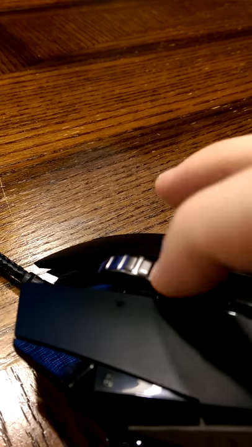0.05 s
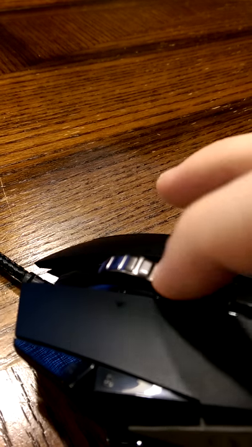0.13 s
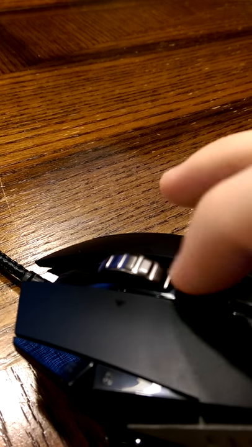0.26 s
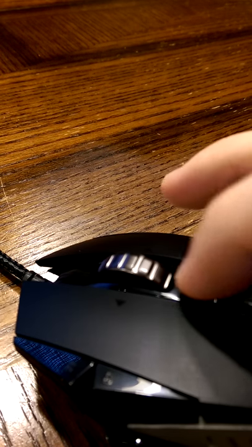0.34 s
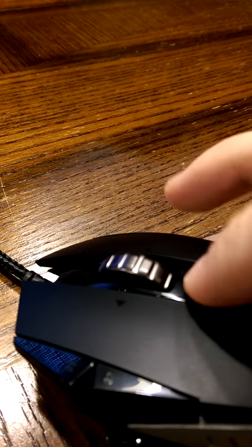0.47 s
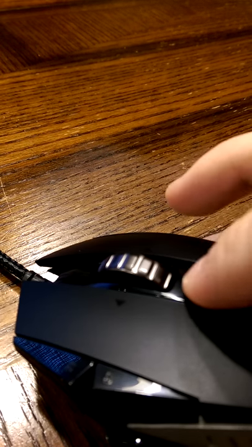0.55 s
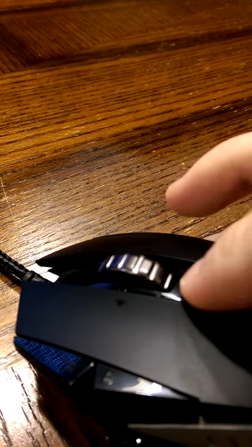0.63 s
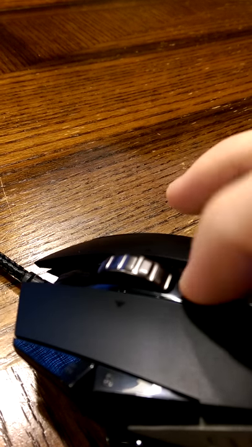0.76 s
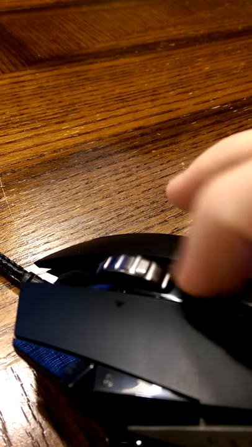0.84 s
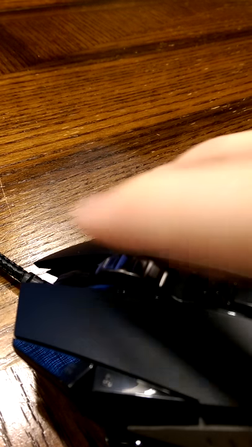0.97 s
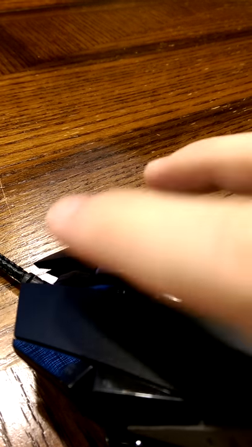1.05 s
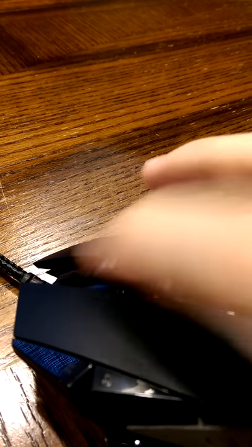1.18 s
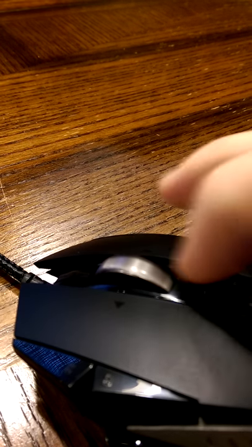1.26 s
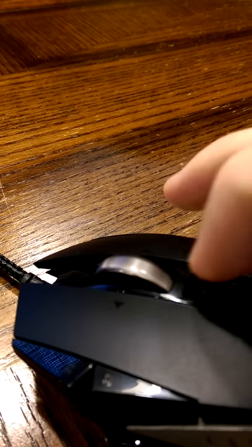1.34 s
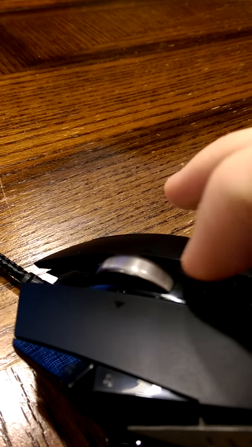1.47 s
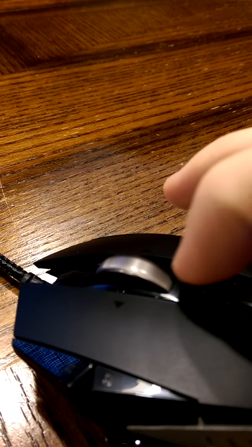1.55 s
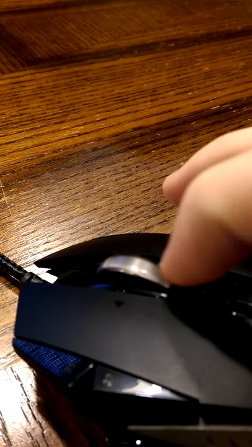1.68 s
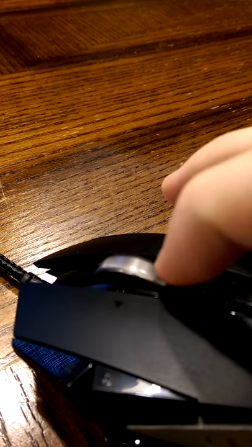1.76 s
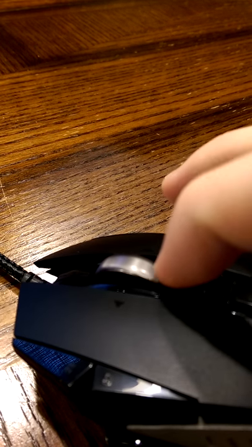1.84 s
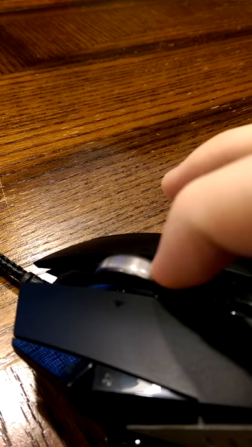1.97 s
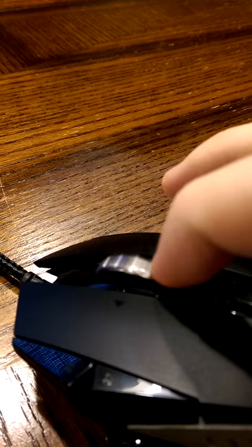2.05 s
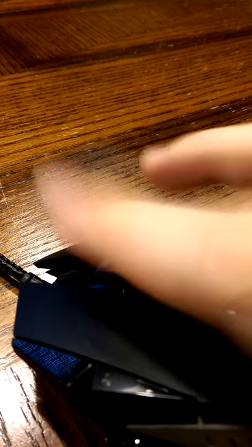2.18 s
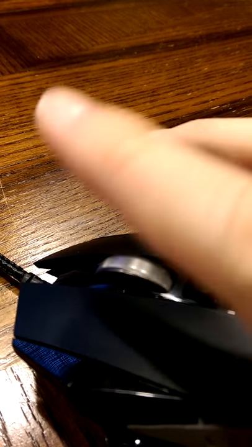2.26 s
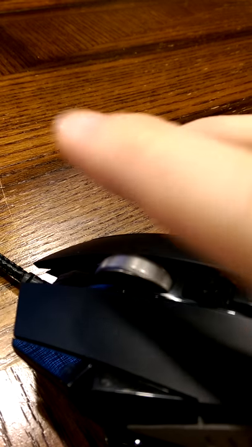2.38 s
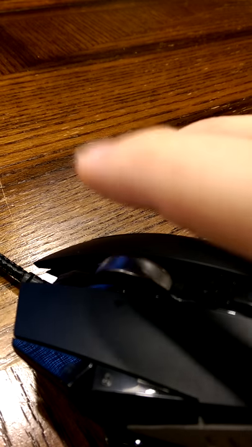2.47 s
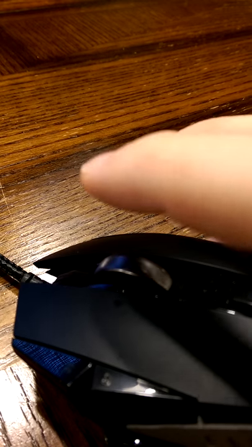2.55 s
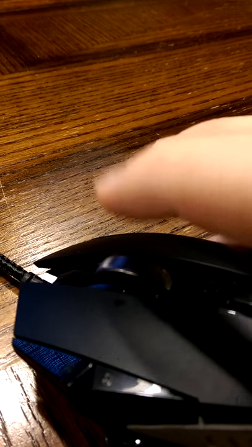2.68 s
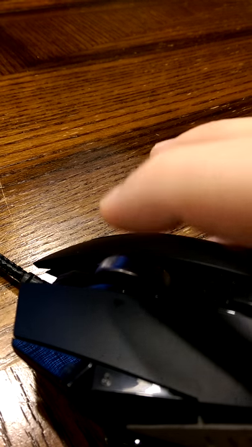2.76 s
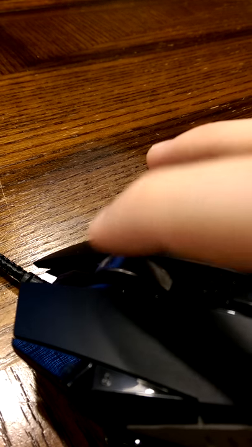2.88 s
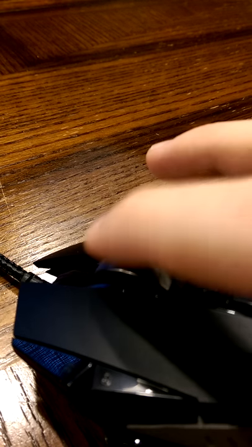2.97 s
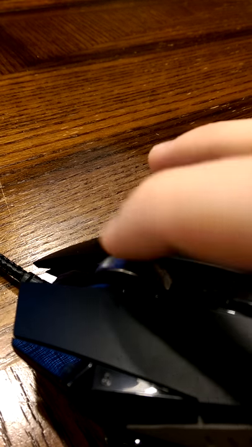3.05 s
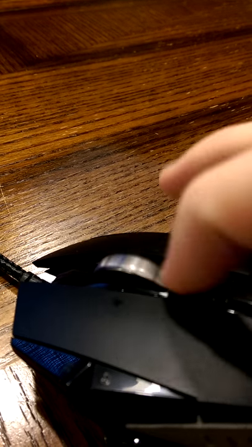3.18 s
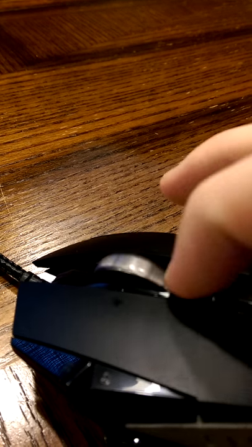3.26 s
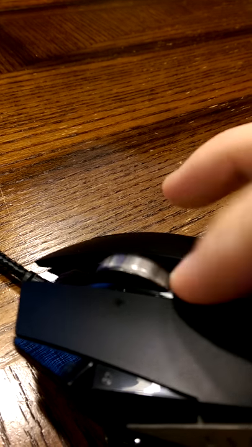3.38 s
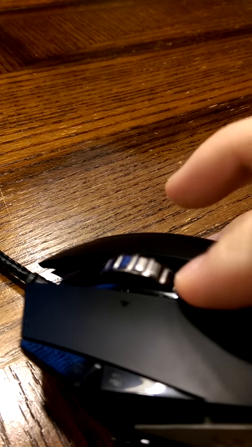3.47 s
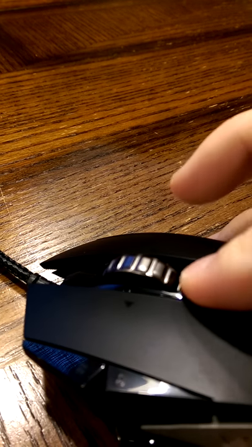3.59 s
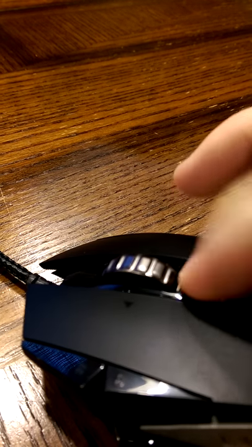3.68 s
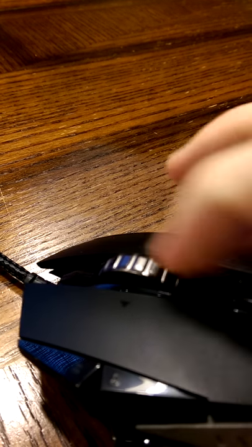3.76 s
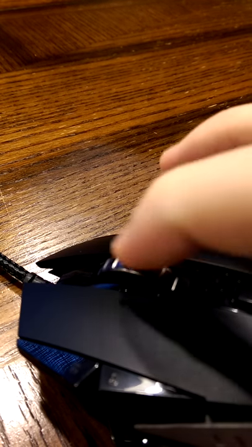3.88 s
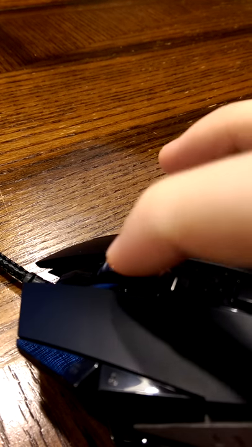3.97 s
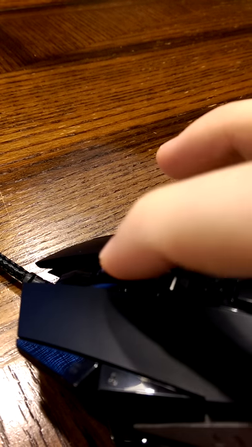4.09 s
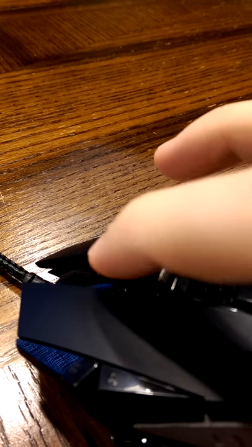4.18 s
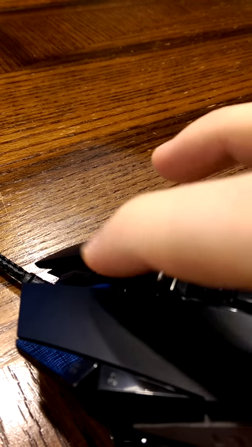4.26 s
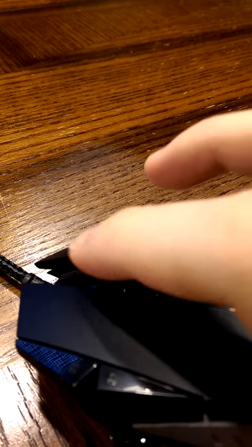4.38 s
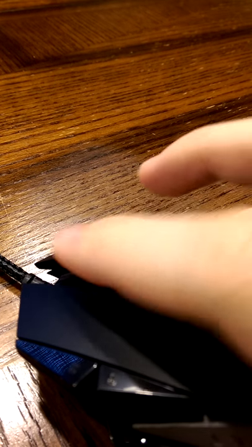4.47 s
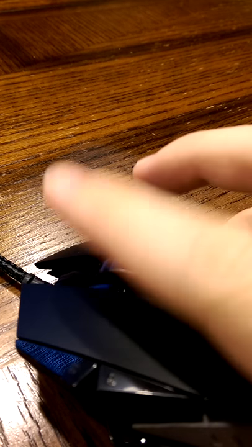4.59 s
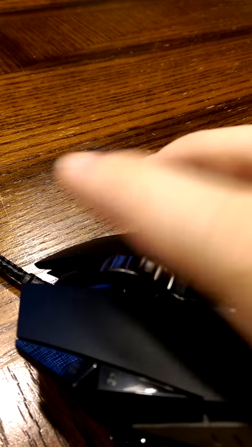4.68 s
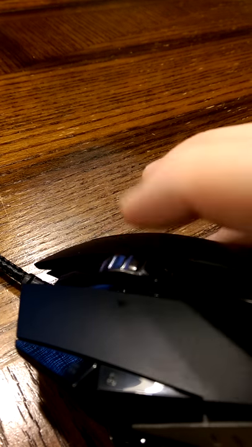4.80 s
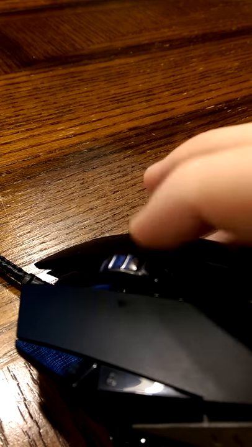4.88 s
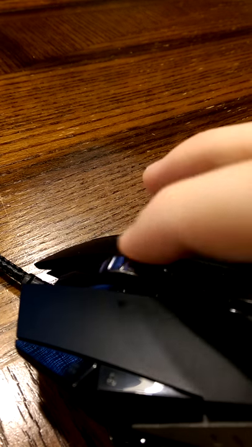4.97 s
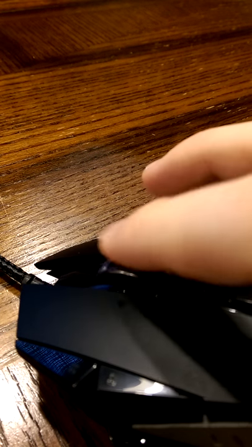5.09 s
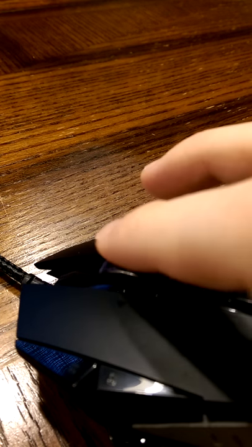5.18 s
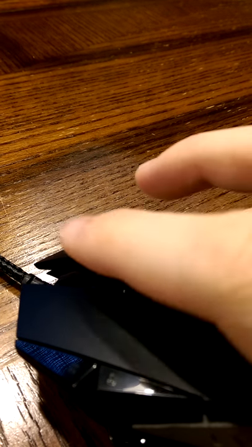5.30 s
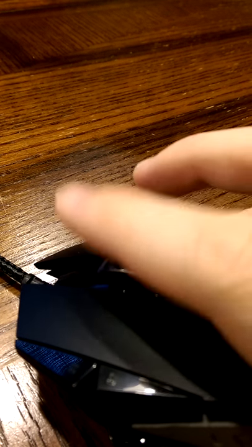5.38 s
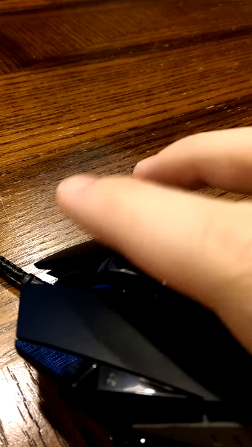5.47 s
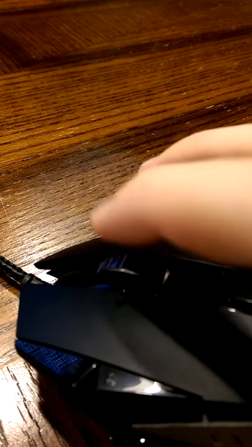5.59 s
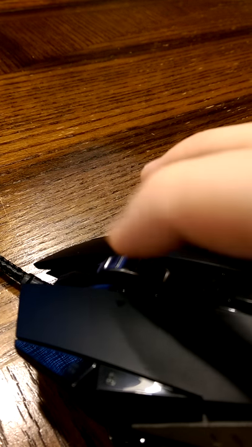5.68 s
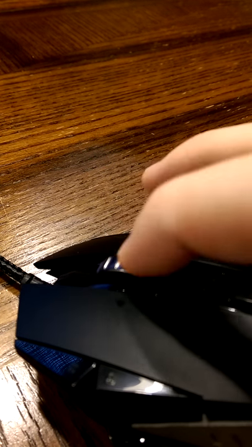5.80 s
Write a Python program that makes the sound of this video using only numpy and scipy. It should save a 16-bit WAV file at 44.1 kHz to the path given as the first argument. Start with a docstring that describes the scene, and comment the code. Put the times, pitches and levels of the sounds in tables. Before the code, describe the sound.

A quiet small room with low murmur and soft microphone hiss. A mouse with a metal scroll wheel sits on a wooden desk, miked very close; one channel is bright, the other shaded and duller. A tiny click comes at 0.46 s, then a loud, bright latch snap at 0.68 and a weaker one at 0.88, with light clicks and a pat beside it and a thin spring ring fading after. From about 1.2 to 3.3 s the wheel spins freely: a faint wavering whir, low rumble and fine rattle with irregular little knocks, coasting away afterwards. Fingertip pats at 3.3 lead to a dense flurry of clicks around 3.5, then hard snaps at 3.57 and 3.77, spring singing on. Slow ratchet clicks with dull desk thumps run 4.25-4.6, single clicks fall at 5.0 and 5.2, and a fast crisp burst at 5.3-5.44. Hiss remains.

```python
"""In a quiet, hissing room, a finger works the metal scroll wheel of a mouse on a wooden desk, by a phone.
First a detent clicks and a latch snaps the ratchet off; its spring sings on as decaying bands of noise.
Then the wheel spins freely: wavering noise makes a faint whir, and struck resonances make the axle's knocks.
A fingertip pats the shell, more detents click and the latch snaps back: noisy blows that ring small parts.
Last, the wheel rolls over its detents in short bursts that thump the desk. One port is close, one shaded."""
import sys
import numpy as np
from scipy import signal
from scipy.fft import rfft, irfft
from scipy.io import wavfile

SR = 44100
rng = np.random.default_rng(int(sys.argv[2]) if len(sys.argv) > 2 else 0)


def master(y):
    """Save y as 16-bit WAV."""
    cut = np.clip(np.atleast_2d(y).T, -1, 1)
    pcm = np.round(cut * 32767)  # scale
    wavfile.write(sys.argv[1], SR, pcm.astype(np.int16))


N = 257544
TIME = np.arange(N) / SR

# murmur of the quiet room and hiss of the microphone, before the port colours: (f/Hz, level per Hz/dB)
QUIET_COLOUR = [(15, -39.5), (25, -13.5), (86, -2.5), (160, -10.5), (253, -0.5), (274, -8.5), (482, -9),
                (537, -13), (1410, -29), (2170, -27), (2850, -29.5), (3170, -29), (5730, -29.5),
                (7500, -30.5), (15500, -34)]
QUIET_DB = -65.5  # base level, before the colours below
# colours of the murmur at both ports, of each port's own hiss, and of each port: (f/Hz, gain/dB)
SHARED_MURMUR = [(40, -7.0), (150, -3), (400, -7.0), (1000, -5.5), (3000, -13.5)]
OWN_HISS = [(40, 1.5), (150, -10.5), (400, -8.5), (1000, 0.0), (3000, 3.0)]
NEAR_PORT = [(100, 2), (400, 10.0), (5000, 0.82), (15000, 0.49)]
FAR_PORT = [(100, -2.5), (400, 2.4), (5000, -0.5), (15000, -0.2)]

# colour of the room's answer: (f/Hz, gain/dB)
ROOM_COLOUR = [(100, -15), (400, 1.5), (900, 2), (1400, 6), (1900, 4), (2400, 4.5), (3700, -0.5),
               (5000, -1), (7000, -3.5), (8600, -5), (11000, -1.5), (15000, -17)]
# time the room takes to fade by 60 dB: (f/Hz, t60/s)
ROOM_FADE = [(200, 0.92), (1200, 0.34), (3500, 0.38), (7000, 0.52), (11000, 0.48), (15000, 0.69)]
# the shaded port against the near one, for direct sound: (f/Hz, gain/dB)
DIRECT_SHADE = [(100, -9.5), (300, -2.5), (700, -5), (1200, -4), (1700, -5), (2400, -22), (4000, -24),
                (6000, -24), (8000, -33.5), (11000, -38.5), (15000, -26)]
# colour of the shaded port's room sound: (f/Hz, gain/dB)
FAR_ROOM_SHADE = [(200, 7), (1300, 0), (3000, -6), (5000, -8.5), (7000, -15.5), (11000, -17.5),
                  (15000, -20)]
# colour of the ratchet's echo off a nearby surface: (f/Hz, gain/dB)
BOUNCE_COLOUR = [(300, -10), (1000, -3.0), (2500, 4.0), (8000, -13.5)]
TOP_HZ = 15800  # the treble is cut above this

# resonances of the desk under the mouse: (f/Hz, width/Hz, peak level/dB)
DESK_MODES = [(167, 11, -0.5), (200, 22, -7.5), (275, 7.7, 2), (285.5, 10, 2), (334.8, 4.9, 7),
              (381, 32, -6), (545.5, 12, -10), (760, 110, -14.5)]
# resonances of the wheel in its cradle: (f/Hz, width/Hz, peak level/dB)
WHEEL_MODES = [(963, 51, -2.5), (1142, 110, 5), (1297.6, 400, -2.5), (1341, 130, -15)]
# resonances of the pawl, the small catch on the teeth: (f/Hz, width/Hz, peak level/dB)
PAWL_MODES = [(1816, 280, -5.5), (2247, 220, -3), (2780, 120, -2), (3450, 220, -7.5), (4940, 340, -6.5),
              (5768, 170, -3), (6900, 300, -7.5), (7260, 100, -7), (8030, 100, -6.5), (8100, 140, -19.5),
              (9700, 700, -20), (12500, 1300, -38.5)]
# resonances of the latch and the shell: (f/Hz, width/Hz, peak level/dB)
LATCH_MODES = [(1510, 89, -3), (1740, 96, -3.5), (2040, 200, -2), (2230, 190, 4.5), (3070, 180, 2),
               (3750, 67, -3), (4900, 370, 5), (5750, 1200, -5.5), (6607, 220, 3.5), (7800, 250, 0),
               (8450, 190, -16), (9790, 790, -4.5), (10930, 210, 3), (11070, 170, -4), (12170, 1200, -4.5)]
# colour of the desk's dull thud: (f/Hz, gain/dB)
THUD_COLOUR = [(30, -15.0), (80, -2.5), (300, -1.5), (600, -5.0), (1000, -3.5), (2500, -37.0)]
# colour of the wheel's ring at a click: (f/Hz, gain/dB)
WHEEL_COLOUR = [(1500, -3.5), (4000, -4)]

# the free spin, before its trims: (t/s, rumble level in the desk/dB, rattle level of the wheel/dB)
SPIN_LEVELS = [(1.25, -58.5, -67.5), (1.35, -59.5, -70), (1.98, -59, -72.5), (2.05, -51.5, -66.5),
               (2.16, -63, -72.5), (2.9, -62.5, -70), (3.02, -71.5, -79), (3.03, -56, -64),
               (3.13, -70.5, -79.5), (3.25, -64.5, -67)]
SPIN_DOWN_S = 0.47  # the wheel coasts to rest
# colour of the bearing's rumble: (f/Hz, level per Hz/dB)
RUMBLE_COLOUR = [(60, -24.5), (150, -10.5), (220, -12.5), (280, 0), (345, -9), (400, -6), (520, -17.5),
                 (750, -14.5), (1500, -37)]
# colour of the bearing's hiss, heard as rattle: (f/Hz, level per Hz/dB)
RATTLE_COLOUR = [(700, -24.5), (1000, -7), (1200, -6), (1450, -14), (1800, -12.5), (2350, -11.5),
                 (3300, -19), (4300, -20), (5050, -20.5), (6200, -28.5), (10000, -30.5), (15000, -43.5)]
# the hardest knocks of the axle in its bearing, before trims: (t/s, level/dB)
HARD_AXLE_KNOCKS = [(1.2104, -45.5), (1.4575, -46), (1.671, -48.5), (1.7849, -46), (1.9828, -49),
                    (2.0226, -48.5), (2.038, -46.5), (2.3279, -50), (2.4202, -49), (2.5128, -49),
                    (2.5793, -48), (2.6281, -47.5), (2.8169, -47.5), (3.035, -48.5), (3.0955, -52),
                    (3.1946, -50.5)]
# lighter knocks come at uneven gaps between these times
KNOCKS_FROM_S, KNOCKS_TO_S, KNOCKS_PER_S, KNOCK_JITTER_S = 1.27, 3.28, 26, 0.013
LIGHT_KNOCK_DB, KNOCK_SPREAD_DB = -58.5, 2.5  # before trims
# a soft contact leaves little above the wheel's own ring: (f/Hz, gain/dB)
KNOCK_COLOUR = [(1350, 3.0), (1750, -14)]

# the fingertip lands on the shell: (t/s, pat level/dB)
FINGER_TOUCHES = [(0.858, -48.5), (3.3114, -41.5), (3.342, -47)]
# colour of the soft pat: (f/Hz, gain/dB)
PAT_COLOUR = [(40, 5), (100, 2), (600, -1), (900, -12), (1600, 1.5), (3400, -15.5), (4300, -27)]

# the latch spring sings on after a snap: (t/s, f/Hz, width/Hz, t60/s, starting level/dB)
SPRING_SONGS = [(0.676, 4960, 260, 0.39, -45.5), (0.883, 5330, 500, 0.27, -54),
                (3.567, 7390, 400, 0.4, -51), (3.771, 6230, 304, 0.48, -46.5),
                (3.772, 7440, 195.6, 0.6, -52.5)]
# the latch button, pressed and let go twice:
# (t/s, level/dB, brightness/dB, wheel ring level/dB, desk thump level/dB)
LATCH_SNAPS = [(0.6751, -13.5, 3, -31, -44.5), (0.8822, -23, 4, -44.5, -49),
               (3.5671, -13.5, 2.5, -39, -38.5), (3.7708, -13.5, 10.5, -27, -46.5)]

# the wheel's clicks at its detents; a few dull rows, just after a loud click, are the wheel rocking back: (t/s,
# level/dB, brightness/dB, desk thump level/dB)
DETENT_CLICKS = [(0.4626, -56.5, 14, -80), (0.8447, -46.5, 5, -47.5), (0.8786, -43, 12, -56),
                 (1.2103, -51, -12, -56.5), (3.265, -52, 21.5, -69), (3.4933, -38, 1, -50.5),
                 (3.5039, -40.5, 7, -48), (3.5345, -38.5, -6, -56), (3.542, -39.5, -7, -45.5),
                 (3.5545, -43.5, 4, -47.5), (3.5634, -35.5, -7, -51.5), (4.2464, -35.5, 0, -45),
                 (4.269, -48.5, -19, -43), (4.4362, -37.5, 5.5, -38.5), (4.506, -39.5, 3, -40),
                 (4.5497, -38, 12, -46), (4.5720, -40.5, -9, -47.5), (4.5942, -48.5, 10.5, -46),
                 (5.005, -51.5, 14, -61.5), (5.204, -39, 7, -46), (5.295, -35.5, 6.5, -50.5),
                 (5.3188, -32, -3, -42), (5.3442, -35.5, -12, -43.5), (5.3535, -43.5, 5, -42.5),
                 (5.4276, -41, 2, -41), (5.4384, -43, -13, -46)]
# the pawl's own blow rings the wheel too, against the click's level
PAWL_RING_DB = -8.5
# the wheel seats just after the pawl; tick and ring levels are against the click
SEAT_LAG_S, SEAT_DB, SEAT_BRIGHT_DB, SEAT_RING_DB = 0.002, -12.5, -9.5, -4
# rolled slowly between these times, the wheel takes up its slack with a dull knock before each tooth
SLOW_FROM_S, SLOW_TO_S, SLACK_LEAD_S = 4.2, 4.56, 0.0068
# knock and ring against the click, thump against the click's thump
SLACK_DB, SLACK_BRIGHT_DB, SLACK_RING_DB, SLACK_THUMP_DB = -9.5, -13.5, -13, -11
# colour of the pawl's rub: (f/Hz, gain/dB)
RUB_COLOUR = [(400, -23.0), (1200, -9.0), (4000, -10), (7600, 1.0), (10000, -10.0), (15000, -22.5)]


def undb(db):
    """Turn decibels into a gain."""
    return 10 ** (np.asarray(db) / 20)


def unit(x):
    """Scale to an rms (average strength) of 1."""
    return x / np.sqrt(np.mean(x ** 2))


def unit_energy(x):
    """Scale so that the squares of all samples add up to 1."""
    return x / np.sqrt(np.sum(x ** 2))


def on_log_axis(points, hz):
    """Read (f/Hz, value) points along a log-frequency axis."""
    f, value = np.transpose(points)
    return np.interp(np.log(np.maximum(hz, 1)), np.log(f), value)


def colour(x, points, size=4096):
    """Filter by (f/Hz, gain/dB) points; folding the cepstrum forward in time keeps the filter causal."""
    gain = undb(on_log_axis(points, np.fft.rfftfreq(size, 1 / SR)))
    cepstrum = irfft(np.log(gain))
    cepstrum[1:size // 2] *= 2
    cepstrum[size // 2 + 1:] = 0
    response = irfft(np.exp(rfft(cepstrum)))
    return signal.fftconvolve(x, response)[:len(x)]


def noise(points):
    """Make coloured noise of rms 1."""
    return unit(colour(rng.standard_normal(N), points))


def walk(rate):
    """Wander at random, with this many new values per second and a spread near 1."""
    knots = rng.standard_normal(N // 100)
    return np.interp(TIME * rate, np.arange(len(knots)), knots)


def delay(x, seconds):
    """Play the same sound later."""
    return np.concatenate([np.zeros(int(seconds * SR)), x])[:len(x)]


def add(track, s, sound):
    """Mix a sound into a track at time s."""
    start = int(s * SR)
    track[start:start + len(sound)] += sound[:N - start]


def sized(x, db, span_s=0.005):
    """Give a blow the energy of span_s seconds at this level."""
    return unit_energy(x) * undb(db) * np.sqrt(span_s * SR)


def ring(modes, size, detune=0., spread_db=0.):
    """Ring a body as one fading wave per resonance, each varied a little with the place of the blow."""
    t = np.arange(size) / SR
    out = np.zeros(size)
    chances = rng.standard_normal((len(modes), 2))
    for k, ((hz, width, db), (pitch_chance, level_chance)) in enumerate(zip(modes, chances)):
        fade = np.exp(-np.pi * width * t)
        wave = fade * np.cos(2 * np.pi * hz * (1 + detune * pitch_chance) * t)
        sign = (-1) ** k
        # a wider resonance fades sooner, so it starts stronger to reach the same peak
        out += sign * undb(db + spread_db * level_chance) * width * wave
    return out


def contact(length_s, size=1024, count=5):
    """Make a blow that starts at once and chatters for a moment, random but even across the spectrum."""
    t = np.arange(1, size + 1) / SR / length_s
    shape = np.sqrt(t) * np.exp(-t)
    x = rng.standard_normal(size) * shape
    for _ in range(count):  # flatten the spectrum, then fade again
        spectrum = rfft(x)
        x = irfft(spectrum / (abs(spectrum) + 1e-12)) * np.sqrt(shape)
    return x


def radiate(x, edge_hz):
    """Cut the bass: a small part moves almost no air below its edge frequency."""
    return signal.sosfilt(signal.butter(N=4, Wn=edge_hz, btype="high", fs=SR, output="sos"), x)


def strike(modes, length_s, crack, detune=0.005, spread_db=3.0, edge_hz=900, size=2048):
    """Ring a body with a chattering blow; beside the ring comes a toneless crack."""
    ringing = unit(signal.fftconvolve(contact(length_s), ring(modes, size, detune, spread_db)))
    toneless = unit(np.pad(contact(length_s), (0, size - 1)))
    return radiate(ringing + crack * toneless, edge_hz)


def quiet_room():
    """Low room murmur reaches both ports alike; each port adds hiss of its own."""
    shared = colour(noise(QUIET_COLOUR), SHARED_MURMUR) * undb(walk(15))
    near_hiss, far_hiss = (colour(noise(QUIET_COLOUR), OWN_HISS) for _ in range(2))
    near = colour(shared + near_hiss, NEAR_PORT)
    far = colour(shared + far_hiss, FAR_PORT)
    return undb(QUIET_DB) * np.array([near, far])


def room(x, build_s, size=32768):
    """A small room answers with a diffuse tail that builds up, then fades at a rate set by frequency."""
    hz, t, cells = signal.stft(rng.standard_normal(size), SR, nperseg=256)
    fade = undb(-60 * t / on_log_axis(ROOM_FADE, hz)[:, None])
    tail = signal.istft(cells * fade, SR)[1]
    tail *= 1 - np.exp(-(np.arange(len(tail)) / SR / build_s) ** 2)
    return colour(signal.fftconvolve(x, unit_energy(tail))[:N], ROOM_COLOUR)


def reflection(x, lag_s, db, smear_s):
    """A nearby surface throws the sound back, a little scattered."""
    scattered = signal.fftconvolve(x, unit_energy(contact(smear_s)))[:N]
    return undb(db) * delay(scattered, lag_s)


def thump(rise_s=0.001, thud_db=-9):
    """The heavy desk takes a moment to get ringing, beside a dull thud."""
    desk = ring(DESK_MODES, size=16384, detune=0.0047, spread_db=4.5)
    desk = unit(desk * (1 - np.exp(-np.arange(len(desk)) / SR / rise_s)))
    thud = colour(contact(0.0038, size=len(desk)), THUD_COLOUR)
    return desk + undb(thud_db) * unit(thud)


def axle_knocks(count=90):
    """The loose axle gives a few hard knocks among many light ones: rows of (t/s, level/dB)."""
    late, force = rng.standard_normal((count, 2)).T
    times = KNOCKS_FROM_S + np.arange(count) / KNOCKS_PER_S + KNOCK_JITTER_S * late
    light = zip(times, LIGHT_KNOCK_DB + KNOCK_SPREAD_DB * force)
    return list(HARD_AXLE_KNOCKS) + [(s, db) for s, db in light if s < KNOCKS_TO_S]


def free_spin(rumble_db, rattle_db, rough_db, knock_db, knock_s, tick_db, thump_db):
    """The bearing rumbles through the desk and rattles the wheel; now and then the axle knocks."""
    s, desk_db, wheel_db = np.transpose(SPIN_LEVELS)
    turning = np.interp(TIME, [s[0] - .02, s[0], s[-1], s[-1] + SPIN_DOWN_S], [0, 1, 1, 0])
    rumble = noise(RUMBLE_COLOUR) * undb(np.interp(TIME, s, desk_db) + rumble_db + walk(59))
    rattle_level = np.interp(TIME, s, wheel_db) + rattle_db + rough_db * walk(130)
    rattle = noise(RATTLE_COLOUR) * undb(rattle_level)
    out = (rumble + rattle) * turning
    for s, db in axle_knocks():
        knock = colour(strike(WHEEL_MODES, knock_s, 0), KNOCK_COLOUR)
        tick = strike(PAWL_MODES, .002, 0.14)
        desk = ring(DESK_MODES[2:6], size=8192, detune=.05)
        add(out, s, sized(knock, db + knock_db))
        add(out, s, sized(tick, db + tick_db))
        add(out, s, sized(desk, db + thump_db))
    return out


def fingertip(contact_s, nail_db, thump_db):
    """Soft flesh gives a dull, toneless pat; the nail ticks and the desk thumps faintly."""
    out = np.zeros(N)
    for s, db in FINGER_TOUCHES:
        pat = colour(contact(contact_s, size=2048), PAT_COLOUR)
        nail = strike(PAWL_MODES, contact_s, .4)
        add(out, s, sized(pat, db))
        add(out, s, sized(nail, db + nail_db))
        add(out, s, sized(thump(), db + thump_db, .025))
    return out


def spring_song(size=22050):
    """The spring's coils share close partials, made as a narrow band of noise that outlasts the snap."""
    out, t = np.zeros(N), np.arange(size) / SR
    for s, hz, width, t60, db in SPRING_SONGS:
        band = [(hz - 2 * width, -45), (hz - width / 2, -3), (hz, 0),
                (hz + width / 2, -3), (hz + 2 * width, -45)]
        cluster = unit(colour(rng.standard_normal(size), band))
        add(out, s, cluster * undb(db - 60 * t / t60))
    return out


def clicks(table, modes, contact_s, wheel_s, crack, detune, top_db, thump_lag_s):
    """A spring drops into place: the small part cracks, the wheel rings, the desk thumps."""
    out = np.zeros(N)
    for s, db, bright_db, wheel_db, thump_db in table:
        half_db = bright_db / 2  # brightness lowers the bass side and lifts the treble side
        tilt = [(2500, -half_db), (9000, half_db), (11500, half_db + top_db / 4), (15500, half_db + top_db)]
        part = colour(strike(modes, contact_s, crack, detune), tilt)
        wheel = colour(strike(WHEEL_MODES, wheel_s, 0, edge_hz=360), WHEEL_COLOUR)
        add(out, s, sized(part, db))
        add(out, s, sized(wheel, wheel_db))
        add(out, s + thump_lag_s, sized(thump(), thump_db, 0.016))
    return out


def pawl_rub(rub_db, swell_s, size=2048):
    """Before each click the pawl slides up a tooth with a thin hiss; a louder, brighter click hisses more."""
    out = np.zeros(N)
    swell = np.exp(-np.arange(size)[::-1] / SR / swell_s)
    for s, db, bright_db, _ in DETENT_CLICKS:
        hiss = unit(colour(rng.standard_normal(size), RUB_COLOUR))
        add(out, s - size / SR, hiss * swell * undb(db + bright_db / 2 + rub_db))
    return out


def detent_blows():
    """The pawl clicks, then the wheel seats without a thump; in a slow roll a slack knock comes first."""
    blows = []
    for s, db, bright_db, thump_db in DETENT_CLICKS:
        blows.append((s, db, bright_db, db + PAWL_RING_DB, thump_db))
        blows.append((s + SEAT_LAG_S, db + SEAT_DB, SEAT_BRIGHT_DB, db + SEAT_RING_DB, -np.inf))
        if SLOW_FROM_S < s < SLOW_TO_S:
            blows.append((s - SLACK_LEAD_S, db + SLACK_DB, SLACK_BRIGHT_DB,
                          db + SLACK_RING_DB, thump_db + SLACK_THUMP_DB))
    return blows


def scene():
    """Mix free spin, fingertip, latch and ratchet at two ports, with the room around them."""
    spin = free_spin(rumble_db=0.5, rattle_db=3.5, rough_db=4.0, knock_db=-2.0, knock_s=.0013,
                     tick_db=-16.5, thump_db=-6.0)
    touches = fingertip(contact_s=0.0012, nail_db=-14, thump_db=-15)
    latch = clicks(LATCH_SNAPS, LATCH_MODES, contact_s=0.0012, wheel_s=0.00025, crack=0.69,
                   detune=.012, top_db=-10.5, thump_lag_s=0.0016)
    # summed over all directions, as the walls hear it, the latch has a far more even spectrum
    latch_all_round = clicks(LATCH_SNAPS, LATCH_MODES, contact_s=.00005, wheel_s=.0001, crack=6.6,
                             detune=0, top_db=-12, thump_lag_s=0.0016)
    ratchet = clicks(detent_blows(), PAWL_MODES, contact_s=0.003, wheel_s=0.0015, crack=0.32,
                     detune=0.023, top_db=-15.5, thump_lag_s=.002)
    ratchet = ratchet + pawl_rub(rub_db=-20.5, swell_s=.011)

    # a nearby surface throws each click back a moment later, the ratchet duller than it came
    ratchet_bounce = colour(reflection(ratchet, lag_s=0.0077, db=-9, smear_s=0.0011), BOUNCE_COLOUR)
    latch_bounce = reflection(latch, lag_s=0.006, db=-16.5, smear_s=0.0044)
    direct = spin + touches + latch + spring_song() + ratchet + ratchet_bounce + latch_bounce

    sent_to_room = undb(-14.0) * latch_all_round + undb(-13) * (ratchet + spin)
    near_room, far_room = (room(sent_to_room, build_s=0.0017) for _ in range(2))
    near = direct + near_room
    # sound bends round the phone to the far port, which dulls it
    far = colour(direct, DIRECT_SHADE) + colour(far_room, FAR_ROOM_SHADE)
    return np.array([near, far]) + quiet_room()


def record(dry):
    """The phone cuts the top of the treble with a steep low-pass filter."""
    return signal.sosfilt(signal.ellip(10, .2, 90, TOP_HZ, fs=SR, output="sos"), dry)


dry = scene()
out = record(dry)
master(out)
```